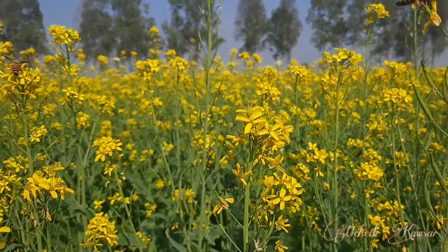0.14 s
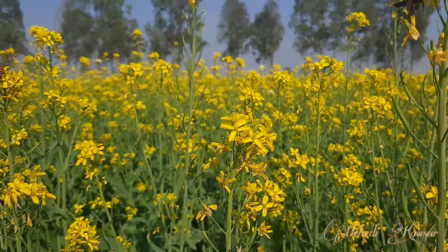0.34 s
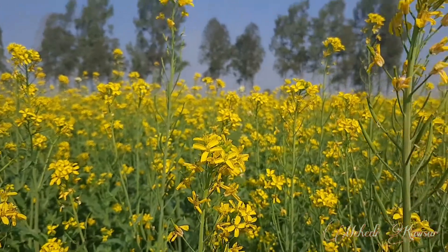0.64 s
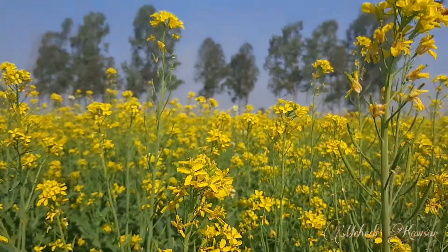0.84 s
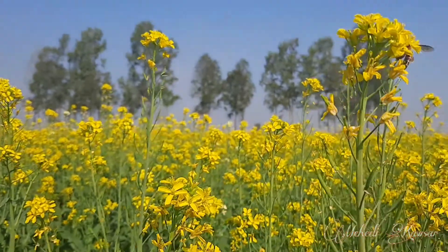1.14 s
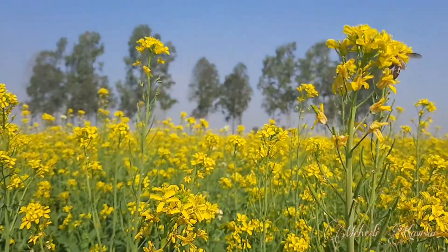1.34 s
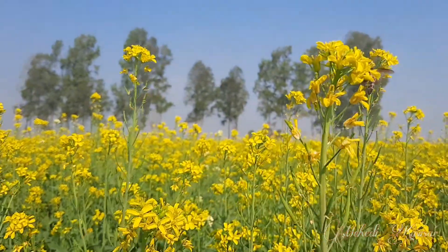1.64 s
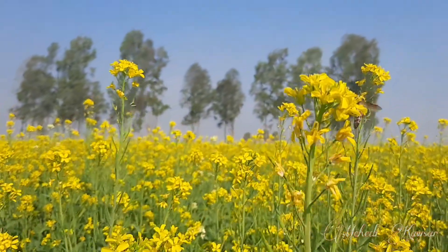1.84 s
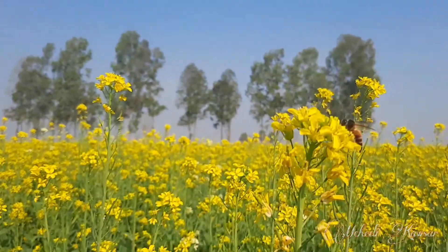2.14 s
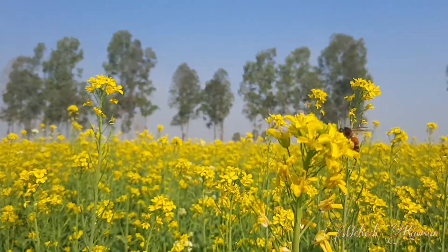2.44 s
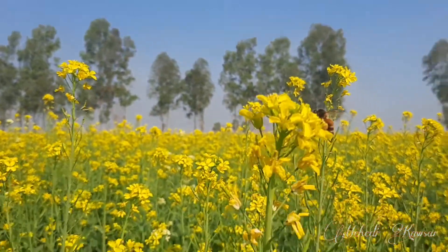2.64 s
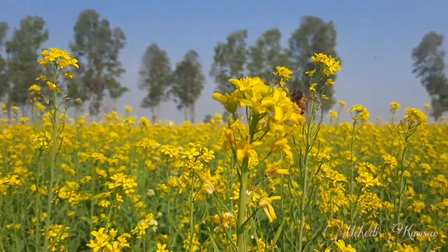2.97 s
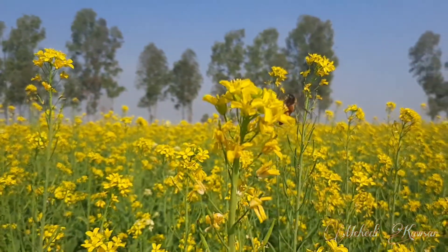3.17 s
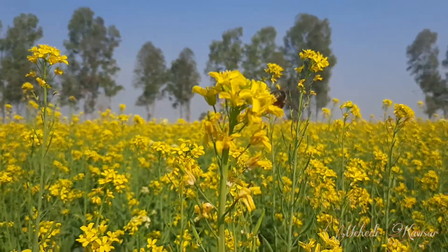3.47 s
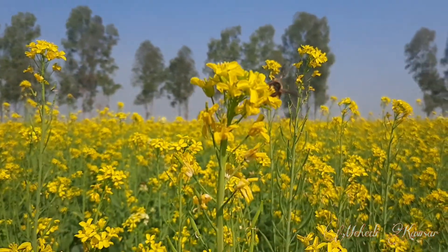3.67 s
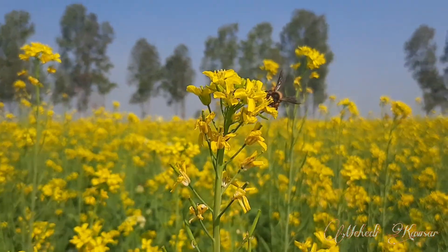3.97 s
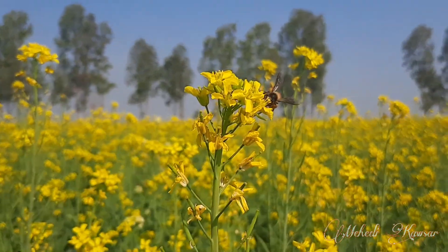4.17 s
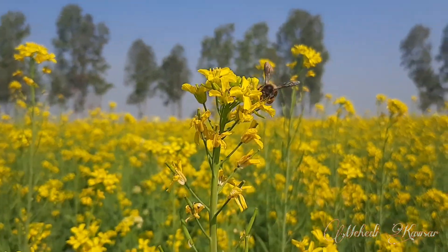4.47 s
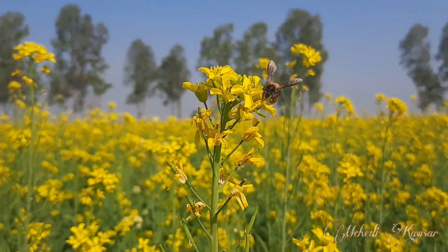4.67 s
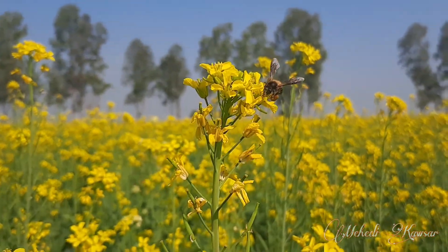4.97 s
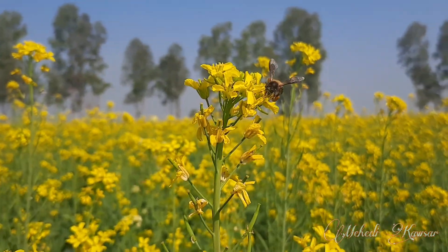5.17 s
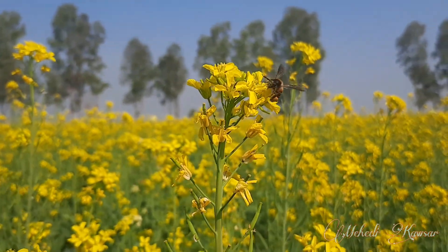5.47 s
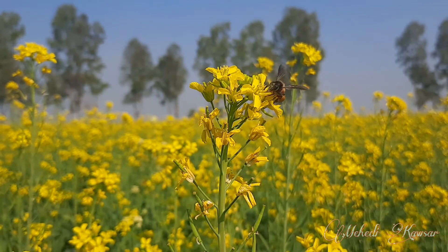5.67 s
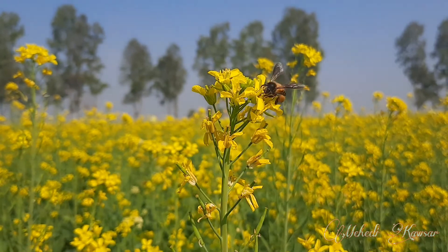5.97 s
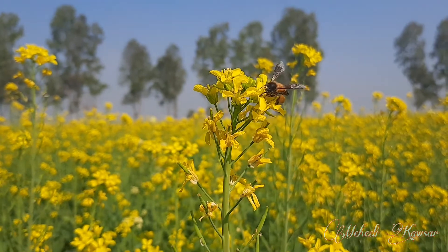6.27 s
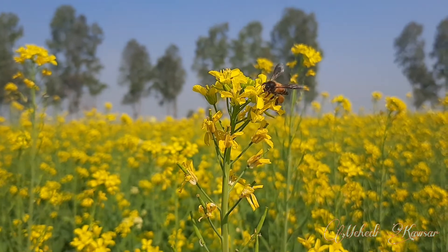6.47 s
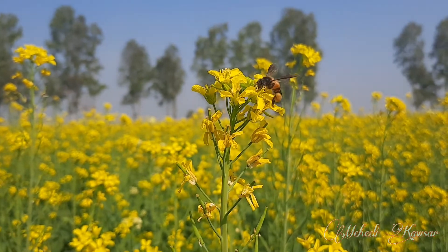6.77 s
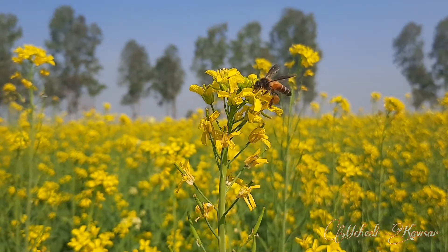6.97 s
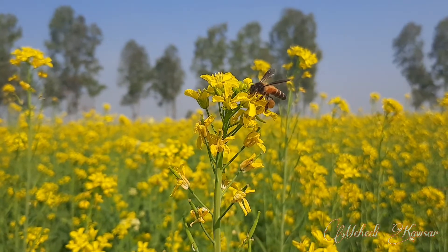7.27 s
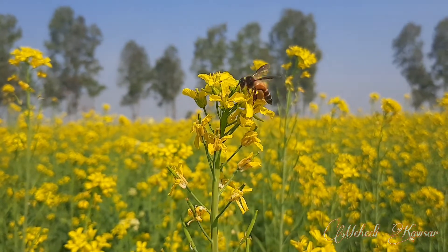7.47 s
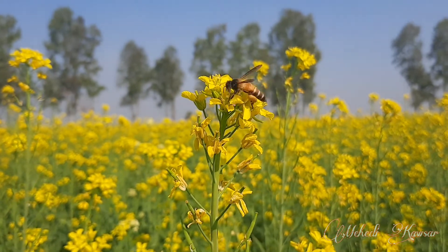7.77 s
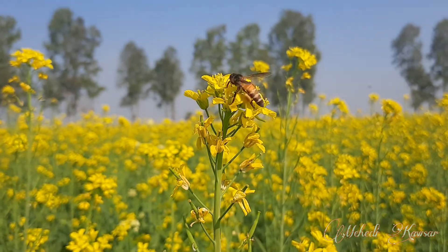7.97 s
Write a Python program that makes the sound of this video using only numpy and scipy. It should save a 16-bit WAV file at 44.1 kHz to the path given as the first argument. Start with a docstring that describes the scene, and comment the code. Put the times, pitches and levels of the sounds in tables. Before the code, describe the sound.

Throughout about eight seconds, a busy flock twitters from trees around an open flowering field, in overlapping hoarse whistles of low, middle and high pitch, slightly right and softened by short leafy echoes. Nearer birds add quick trills, arched whistles, harsh chirrs and falling chips; farther ones give echoing calls and rapid twitters. Below lie fluttering low wind on the microphone, soft airy hiss, and a distant diesel pump thudding between eight and nine times a second, with a fainter, faster engine drone behind. A very faint wavering bee hum fades out by 0.9 s. From about 3.25 to 3.5 s, rough scuffs brush the right side; sharp hollow knocks cluster near 3.65 s, with lighter rubbing until 3.9 s and a small bright tick at 3.8 s. Bird chatter continues, strong around 4.2 to 5.4 s, then somewhat sparser. A faint dull tap falls at 6.9 s.

```python
"""A flock of birds chatters in a line of trees: overlapping hoarse whistles in three registers.
Nearer birds stand out with trills, arches, whistles, chirrs and chips; farther ones call and twitter.
Coloured noise makes the light wind on the microphone and the air in the flowering field. Far-off diesel
pumps thud on as pulse trains; wing-beat harmonics make a bee that hums briefly and lands. Near the middle,
scuffs of noise and ringing knocks brush the right port; a bright tick and a late, dull tap are noise bursts."""
import sys
import numpy as np
from scipy import signal
from scipy.fft import rfft, irfft, next_fast_len
from scipy.io import wavfile
from scipy.ndimage import uniform_filter1d

SR = 44100
rng = np.random.default_rng(int(sys.argv[2]) if len(sys.argv) > 2 else 0)


def persist_wave(psi):
    """Save psi, clipped to +-1, as 16-bit WAV."""
    counts = np.round(np.clip(psi, -1, 1) * 32767).astype(np.int16)
    wavfile.write(sys.argv[1], SR, np.atleast_2d(counts).T)


N = 358091
TIME = np.arange(N) / SR


def undb(db):
    """Decibels to amplitude gain."""
    return 10 ** (np.asarray(db) / 20)


def level(x, db):
    """Scale to an rms level."""
    return x * undb(db) / np.sqrt(np.mean(x ** 2) + 1e-20)


def pan(left_minus_right_db):
    """Left and right gains for a level difference, at constant power."""
    return level(undb(np.array([[left_minus_right_db], [-left_minus_right_db]]) / 2), 0)


def colour_db(hz, points):
    """Read a spectrum on a log-frequency axis; it falls 20 dB/octave past its ends."""
    f, db = np.transpose(points)
    octave, known = np.log2(hz + 1e-9), np.log2(f)
    beyond = np.abs(octave - np.clip(octave, known[0], known[-1]))
    return np.interp(octave, known, db) - 20 * beyond


def coloured(x, points):
    """Filter a sound by a spectrum, without phase shift."""
    size = next_fast_len(N)
    hz = np.arange(size // 2 + 1) * SR / size
    return irfft(rfft(x, size) * undb(colour_db(hz, points)), size)[..., :N]


def split(x, hz):
    """The parts of a sound below and above a frequency."""
    low = signal.sosfiltfilt(signal.butter(4, hz, fs=SR, output="sos"), x)
    return low, x - low


def walk(rate_hz):
    """Slow smoothed chance with an rms near 1."""
    k = max(int(SR / rate_hz), 1)
    steps = np.repeat(rng.standard_normal(N // k + 1), k)
    return level(uniform_filter1d(steps, k)[:N], 0)


def add(out, start_s, sound):
    """Mix a sound in at a time."""
    i = max(int(start_s * SR), 0)
    part = sound[..., :max(out.shape[-1] - i, 0)]
    out[..., i:i + part.shape[-1]] += part


def scatter(x, t60_s, channels=2):
    """Dense echoes from trunks and foliage: decaying noise, drawn separately for each channel."""
    t = TIME[:SR // 2]
    tail = rng.standard_normal((channels, len(t))) * np.exp(-np.log(1000) * t / t60_s)
    tail /= np.sqrt(np.sum(tail ** 2, axis=1, keepdims=True))
    return signal.fftconvolve(x[None], tail, axes=1)[:, :N]


# wind spectrum: [f/Hz, relative density/dB]
WIND_SPECTRUM = [(20, -34), (35, -21), (48, -8), (62, -3), (90, 1.5), (118, -0.5), (150, -8), (185, -14.5),
                 (240, -18), (300, -25), (370, -38), (600, -44)]


def wind(rms_db=-39.0, gust_db=-0.27, buffet_db=2.5, side_db=-17):
    """Low eddies press on both ports almost alike, swelling and fluttering."""
    mid, side = (level(coloured(rng.standard_normal(N), WIND_SPECTRUM), rms_db) for _ in range(2))
    rumble = mid + undb(side_db) * side * np.array([[1], [-1]])
    return rumble * undb(gust_db * walk(1.4) + buffet_db * walk(14)) * pan(1.0)


# open air and leaves: [f/Hz, relative density/dB]
AIR_SPECTRUM = [(30, -16), (100, -7), (220, 14.5), (400, 4.5), (600, 1), (1000, 0.5), (1270, -7.5),
                (1800, 4), (3200, 9), (4600, 5), (5400, -1), (7000, -2), (8300, -12.5), (11000, -9),
                (15500, -9.5)]
# high-band contour, used relative to the mean of its points: [t/s, level/dB]
HISS_CONTOUR = [(0.0, -67.5), (0.48, -65.5), (1.12, -71), (2.56, -73), (2.88, -67.5), (3.36, -74.5),
                (3.52, -73), (3.84, -73), (4.32, -70.5), (4.8, -76), (4.96, -70), (5.76, -73.5),
                (7.84, -69), (8.12, -75)]


def air(rms_db=-56, flicker_db=2.0, hiss_hz=8500, hiss_db=0, hiss_flicker_db=1):
    """Soft wide noise; the band above hiss_hz follows a level contour with random flicker."""
    noise = level(coloured(rng.standard_normal((2, N)), AIR_SPECTRUM), rms_db)
    low, high = split(noise, hiss_hz)
    t_s, contour_db = np.transpose(HISS_CONTOUR)
    relative_db = np.interp(TIME, t_s, contour_db) - np.mean(contour_db)
    hiss_gain = undb(hiss_db + relative_db + hiss_flicker_db * walk(18))
    return low * undb(flicker_db * walk(2.88)) + high * hiss_gain


def near_pump(thud_hz=105, width_s=0.0072, thud_db=-27.0, spread_db=1.5, port_lag_s=0.00023):
    """A slow single-cylinder diesel; distance rounds each exhaust beat to a soft thud."""
    first_firing_s, start_rate_hz, end_rate_hz = 0.0933, 8.647, 8.605
    turns = np.cumsum(np.linspace(start_rate_hz, end_rate_hz, N)) / SR
    turns -= np.interp(first_firing_s, TIME, turns)
    beat = np.round(turns).astype(int)
    # off to the right: the left port hears it later
    port_delay_s = np.array([[port_lag_s], [-port_lag_s]]) / 2
    since_s = (turns - beat) / np.mean([start_rate_hz, end_rate_hz]) - port_delay_s
    size = undb(thud_db + spread_db * rng.standard_normal(beat[-1] + 2))[beat + 1]
    thuds = -size * np.cos(2 * np.pi * thud_hz * since_s) * np.exp(-(since_s / width_s) ** 2)
    return thuds * pan(0.84)


def far_pump(rms_db=-47.5, rate_hz=10.72):
    """A faster engine further away, its beats smeared by echoes into a drone."""
    beats = np.diff(np.floor(TIME * rate_hz), prepend=0)
    smeared = scatter(beats, t60_s=0.26, channels=1)
    drone = coloured(smeared, [(35, -30), (70, 0.0), (112, -2.0), (165, -7.5),
                               (225, -5), (310, -19), (450, -60.0)])  # f/Hz, gain/dB
    return level(drone, rms_db) * pan(1.0)


# wing tones: [multiple of wing beat, relative level/dB]
WING_HARMONICS = [(3, -8), (4, -14), (5, -17), (6, -16), (7, -18)]


def bee(wing_hz=145, rms_db=-65.5, lands_s=0.94, swerve_db=4):
    """A wavering harmonic wing hum that fades out as the bee settles on a flower."""
    beat_hz = wing_hz * (1 + .026 * walk(20) + .03 * walk(110))
    phase = 2 * np.pi * np.cumsum(beat_hz) / SR
    hum = sum(undb(tone_db + swerve_db * walk(44.3)) * np.sin(round(k) * phase)
              for k, tone_db in WING_HARMONICS)
    fade = np.clip((lands_s - TIME) / 0.11, 0, 1)
    return level(hum, rms_db) * fade * pan(0)  # rms_db is before the fade


def note(length_s, start_hz, middle_hz, end_hz, trill_hz, trill_rate_hz, hoarse_hz=42, edge=0.15,
         overtone_db=-40, throb_hz=900, unsteady=.14):
    """A hoarse whistle arching through three pitches; an uneven trill shakes pitch and loudness."""
    t = TIME[:max(int(length_s * SR), 64)]
    u = t / t[-1]
    # parabola through the start, middle and end pitches
    hz = start_hz * (1 - u) * (1 - 2 * u) + middle_hz * (2 * u) * (2 - 2 * u) + end_hz * u * (2 * u - 1)
    rasp, drift = (level(uniform_filter1d(rng.standard_normal(len(t)), size=k), 0) for k in (48, 400))
    trill = 2 * np.pi * trill_rate_hz * np.cumsum(1 + unsteady * drift) / SR
    phase = 2 * np.pi * np.cumsum(hz + hoarse_hz * rasp + trill_hz * np.sin(trill)) / SR
    swell = np.sin(np.pi / 2 * np.clip(np.minimum(u, 1 - u) / edge, 0, 1))
    throb = 1 - min(trill_hz / throb_hz, .8) * np.cos(trill)
    tone = np.sin(phase) + undb(overtone_db) * np.sin(2 * phase)
    return level(swell * throb * tone, 0)


def at_ports(sound, pan_db, lag_s_per_db=.000088):
    """A sound from one side is later and softer at the far port."""
    lag = int(round(pan_db * lag_s_per_db * SR))
    return np.stack([np.roll(sound, max(-lag, 0)), np.roll(sound, max(lag, 0))]) * pan(pan_db)


# filter on the flock's voices: [f/Hz, gain/dB]
FLOCK_SPECTRUM = [(1300, 8), (1800, -9.5), (2100, -7), (2400, -0.5), (2800, -4), (3450, -2), (4080, -3),
                  (4480, -5), (5100, 0), (6000, -19), (6800, -16), (7800, -21), (8500, 4.5)]
# registers: [lowest f/Hz, highest f/Hz, slide spread/octaves, gain/dB, echo/dB, left minus right/dB]
FLOCK_REGISTERS = [(1900, 2700, 0.064, -0.02, -2.5, -.5), (2995, 4600, 0.1277, -0.5, -3.5, -3.5),
                   (5410, 7600, 0.105, -1.5, 1.5, -1)]
# chatter contours of the three registers, before register gain: [t/s, level/dB]
LOW_CONTOUR = [(0.0, -54), (0.24, -48), (0.32, -57), (1.04, -57.5), (1.64, -52), (2.04, -62), (2.24, -53),
               (2.4, -60), (4.0, -53.5), (4.158, -64), (4.36, -58.5), (4.68, -62.5), (5.28, -53.5),
               (5.72, -62.5), (6.0, -54), (6.24, -67), (6.56, -54.5), (6.8, -64), (6.96, -54), (7.3, -57),
               (7.84, -63.5), (8.12, -55)]
MIDDLE_CONTOUR = [(0.0, -57), (0.12, -53.5), (0.6, -48), (0.76, -53), (1.6, -49), (2.0, -51.5),
                  (2.08, -56.5), (2.8, -50.5), (2.88, -43), (3.08, -58), (3.44, -44), (3.52, -48.5),
                  (3.8, -49.5), (4.16, -54.5), (4.44, -45.5), (4.64, -54.5), (5.24, -47.5), (5.56, -55),
                  (6.15, -52), (6.45, -52), (6.8, -56.5), (6.93, -61), (7.2, -48), (7.36, -55),
                  (8.12, -52.5)]
HIGH_CONTOUR = [(0.0, -63), (0.68, -58.5), (1.16, -67), (1.24, -61), (3.24, -65), (3.36, -55), (3.52, -68),
                (4.52, -59.5), (4.6, -73), (5.36, -59), (5.4, -64.5), (7.0, -67), (7.08, -58),
                (8.12, -69.5)]


def flock(count=850, shortest_s=.012, longest_s=.046, spread_db=2.0, fall_oct=0.044, echo_t60_s=0.44,
          side_db=1.08, flutter_db=0.6):
    """Many birds twitter over one another in three registers, to the right, blurred by the trees."""
    out = np.zeros((2, N))
    contours = (LOW_CONTOUR, MIDDLE_CONTOUR, HIGH_CONTOUR)
    for (low_hz, high_hz, slide_oct, gain_db, echo_db, pan_db), contour in zip(FLOCK_REGISTERS, contours):
        voices = np.zeros((2, N))
        places, shapes = rng.random((count, 4)), rng.standard_normal((count, 4))  # count per register
        for (when, pitch, length, trill), (glide, bend, loud, side) in zip(places, shapes):
            hz = low_hz + (high_hz - low_hz) * pitch
            slide = 2 ** ((fall_oct + slide_oct * glide) / 2)
            length_s = shortest_s + (longest_s - shortest_s) * length
            chirp = note(length_s, hz * slide, hz * (1 + 0.0245 * bend), hz / slide,
                         280 * trill ** 3, 40 + 70 * pitch)
            add(voices, when * N / SR, at_ports(chirp * undb(spread_db * loud), pan_db + side_db * side))
        echo = undb(echo_db) * scatter(voices[1], echo_t60_s) * pan(pan_db)
        chorus = coloured(voices + echo, FLOCK_SPECTRUM)
        # even out the power over 1/16 s, then apply the contour
        chorus /= np.sqrt(uniform_filter1d(np.mean(chorus ** 2, axis=0), SR // 16) + 1e-12)
        contour_db = np.interp(TIME, *np.transpose(contour))
        out += chorus * undb(gain_db + contour_db + flutter_db * walk(14))
    return out


def perch(sound, lag_s=.00023, spread_s=.00005):
    """Each call has its own bearing to the right: the left port hears it a little later."""
    gap = np.zeros(int(abs(lag_s + spread_s * rng.standard_normal()) * SR))
    return np.stack([np.concatenate([gap, sound]), np.concatenate([sound, gap])])


def arched_call(rise_s, fall_s, top_hz, half_width_s, flank_db, hoarse_hz=45, edge_s=.007):
    """A whistle sweeps up to a rounded top and down again, louder or softer on each flank."""
    depth = .47  # share of the top pitch lost far down the flanks
    t = TIME[:max(int((rise_s + fall_s) * SR), 64)] - rise_s
    rasp = level(uniform_filter1d(rng.standard_normal(len(t)), size=48), 0)
    hz = top_hz * (1 - depth * t ** 2 / (t ** 2 + half_width_s ** 2)) + hoarse_hz * rasp
    edges = np.clip(np.minimum(t + rise_s, fall_s - t) / edge_s, 0, 1)
    swell = edges * undb(np.interp(t, [-rise_s, 0, fall_s], flank_db))
    return np.sqrt(2) * swell * np.sin(2 * np.pi * np.cumsum(hz) / SR)


def chirr(length_s, hz, rate_hz, hoarse_hz=600, pulsing=0.18):
    """A scolding buzz: quick pulses of a very hoarse note."""
    voice = note(length_s, hz, hz, hz, 0, 0, hoarse_hz)
    return level(voice * (1 - pulsing * np.cos(2 * np.pi * rate_hz * TIME[:len(voice)])), 0)


# levels of nearer birds are before gain_db and port shading
# trills: [t/s, length/s, middle f/Hz, rise/Hz, shake rate/Hz, level/dB]
TRILL_NOTES = [(0.059, 0.046, 4560, 0, 62, -47), (0.345, 0.12, 4870, 118, 130, -50),
               (2.665, 0.062, 4380, 947, 120, -49), (2.805, 0.14, 3570, 1000, 150, -50.5),
               (3.785, 0.22, 3440, -2, 41.5, -50), (4.354, 0.074, 4370, 45, 51, -50),
               (4.412, 0.072, 4450, 450, 135, -44.5), (6.068, 0.028, 4380, 0, 82, -52)]
# arches: [top t/s, rise/s, fall/s, top f/Hz, half-width/s, start level/dB, top level/dB, end level/dB]
ARCHED_CALLS = [(0.565, .063, .064, 5070, 0.033, -46, -52, -35),
                (1.972, 0.024, .022, 6870, 0.037, -50, -54, -61),
                (2.137, .008, .008, 7000, .016, -56, -55, -56),
                (3.628, 0.031, 0.018, 5060, 0.071, -48, -40, -49),
                (3.735, .006, 0.0616, 5040, 0.046, -49, -46.5, -39.5),
                (4.978, .036, 0.058, 5780, .03, -68, -57.5, -41),
                (5.234, .004, 0.061, 4750, 0.021, -42, -41, -46.5),
                (5.723, 0.013, 0.032, 4650, 0.025, -49, -54, -50),
                (7.23, 0.0087, 0.033, 4780, .027, -49, -48, -48)]
# plain whistles: [t/s, length/s, middle f/Hz, rise/Hz, level/dB]
WHISTLE_NOTES = [(0.591, 0.032, 1950, -300, -56), (0.684, 0.039, 2390, 150, -45),
                 (0.772, 0.043, 2680, -250, -49.5), (0.97, 0.082, 3406, 152, -48),
                 (1.117, 0.051, 3125, 78, -51), (1.153, 0.067, 2070, -300, -50),
                 (1.24, 0.05, 7380, 600, -66.5), (1.399, 0.052, 2600, 40, -47),
                 (2.175, 0.058, 3395, -60, -53), (3.167, 0.013, 4370, -50, -47),
                 (3.189, 0.014, 4270, -50, -43), (4.2, 0.021, 4570, -350, -43),
                 (4.247, .04, 6130, 450, -58.5), (4.256, 0.074, 3537, 76, -45),
                 (4.886, 0.036, 3350, -250, -41), (4.946, 0.04, 5720, 100, -53),
                 (5.05, .013, 3560, 400, -44.5), (5.077, 0.02, 4400, 150, -43),
                 (5.365, 0.019, 7030, 0, -66), (5.425, 0.071, 2560, 70, -46),
                 (6.637, 0.066, 2257, 30, -50.5), (6.68, .032, 6240, 130, -66),
                 (7.726, 0.042, 1015, 0, -66.5), (8.033, 0.037, 4750, -450, -59)]
# harsh chirrs: [t/s, length/s, centre f/Hz, pulse rate/Hz, level/dB]
CHIRR_CALLS = [(0.895, 0.062, 5800, 36, -53.5), (2.336, .065, 4600, 60, -54.5),
               (4.155, 0.049, 5750, 54, -60), (4.28, .035, 5340, 90, -56), (4.828, 0.078, 4800, 51, -54.5),
               (5.061, 0.035, 5330, 80, -54), (5.32, 0.048, 5330, 82, -59), (5.826, .055, 4390, 79, -55),
               (6.213, 0.065, 4970, 70, -56.5)]
# falling chips: [t/s, length/s, start f/Hz, level/dB]
CHIP_NOTES = [(1.267, 0.023, 3780, -50), (1.403, 0.043, 3950, -46), (1.583, 0.019, 5100, -52),
              (1.634, 0.013, 4950, -51), (2.141, 0.021, 4950, -48.5), (2.464, 0.023, 4900, -49),
              (2.592, 0.034, 3870, -54.5), (3.144, 0.014, 4730, -47), (3.147, 0.052, 3730, -49),
              (3.413, 0.034, 3410, -45), (4.299, .025, 4660, -49), (7.274, 0.028, 4640, -46.5),
              (7.487, 0.018, 4970, -49.5), (7.711, 0.027, 4900, -52.5), (8.069, 0.033, 4200, -49.5)]
# casing shading of nearer birds: [f/Hz, left minus right/dB]
CASING_SHADE = [(1500, 29), (2100, 7.5), (2700, -0.5), (3400, -7.5), (4400, -6), (5000, -7), (5700, -3),
                (6700, 13.5), (9000, 26), (15000, -5)]


def birds(gain_db=-1.5, waver_db=1.8, echo_db=-4.0, echo_t60_s=0.15):
    """Nearer birds' trills, arches, whistles, chirrs and chips, with a short wash from the trees."""
    trill_sweep_hz_per_s = 12100  # depth times rate: a faster trill is shallower
    chip_fall_oct_per_s, chip_early_share = 12, .6  # share of the fall done by the chip's middle
    song = np.zeros((2, N))
    for s, length_s, hz, rise_hz, rate_hz, note_db in TRILL_NOTES:
        trill = note(length_s, hz - rise_hz / 2, hz, hz + rise_hz / 2,
                     trill_sweep_hz_per_s / rate_hz, rate_hz, hoarse_hz=60.5)
        add(song, s, perch(trill) * undb(note_db))
    for top_s, rise_s, fall_s, top_hz, half_width_s, *flank_db in ARCHED_CALLS:
        add(song, top_s - rise_s, perch(arched_call(rise_s, fall_s, top_hz, half_width_s, flank_db)))
    for s, length_s, hz, rise_hz, note_db in WHISTLE_NOTES:
        whistle = note(length_s, hz - rise_hz / 2, hz, hz + rise_hz / 2, 0, 0)
        add(song, s, perch(whistle) * undb(note_db))
    for s, length_s, hz, rate_hz, note_db in CHIRR_CALLS:
        add(song, s, perch(chirr(length_s, hz, rate_hz)) * undb(note_db))
    for s, length_s, hz, note_db in CHIP_NOTES:
        fall = 2 ** (-chip_fall_oct_per_s * length_s)
        chip = note(length_s, hz, hz * fall ** chip_early_share, hz * fall, 0, 0)
        add(song, s, perch(chip) * undb(note_db))
    # paths through the foliage interfere, so every note wavers
    left, right = song * undb(gain_db + waver_db * walk(200))
    shaded_left = coloured(left, [(hz, shade / 2) for hz, shade in CASING_SHADE])
    shaded_right = coloured(right, [(hz, -shade / 2) for hz, shade in CASING_SHADE])
    return np.stack([shaded_left, shaded_right]) + undb(echo_db) * scatter(right, echo_t60_s)


def twitter(length_s, first_hz, last_hz, rate_hz, uneven=.28, spread_db=1.0, hoarse_hz=110):
    """A run of tiny falling chips, each a little different in time, pitch and strength."""
    note_s, fall_oct, pitch_spread_oct = 0.0164, .12, 0.0502
    run = np.zeros(int((length_s + 2 * note_s) * SR))
    starts = np.arange(max(round(length_s * rate_hz), 1)) / rate_hz
    slide = 2 ** (fall_oct / 2)
    for s, (late, pitch, loud) in zip(starts, rng.standard_normal((len(starts), 3))):
        hz = np.interp(s, [0, length_s], [first_hz, last_hz]) * 2 ** (pitch_spread_oct * pitch)
        chip = note(note_s, hz * slide, hz, hz / slide, 0, 0, hoarse_hz)
        add(run, s + uneven * late / rate_hz, chip * undb(spread_db * loud))
    return run


# levels of far birds are before gain_db
# twitters: [t/s, length/s, first f/Hz, last f/Hz, chip rate/Hz, level/dB]
TWITTER_RUNS = [(0.107, 0.25, 3530, 3400, 25, -49.5), (0.76, 0.17, 3650, 3290, 32, -53),
                (1.501, 0.071, 4790, 3470, 67, -51.5), (1.673, 0.054, 4480, 3620, 68, -51.5),
                (2.5, .065, 3360, 3300, 46, -49), (3.01, .07, 3450, 3470, 26, -50),
                (5.184, 0.13, 3380, 3530, 56, -50), (6.014, 0.042, 3930, 3400, 73, -53),
                (6.283, 0.211, 3704, 3794, 63, -53.5), (6.563, .14, 3870, 3790, 45, -53.5),
                (6.844, .085, 3390, 2650, 70, -60), (7.063, 0.17, 4320, 4270, 40, -51),
                (7.548, .08, 3580, 3570, 70, -54)]
# far calls, hoarse echoing whistles: [t/s, length/s, start f/Hz, middle f/Hz, end f/Hz, level/dB]
FAR_CALLS = [(0.3, 0.14, 4300, 4710, 4880, -56), (0.64, 0.14, 4700, 5130, 4730, -60),
             (1.034, .11, 3900, 4340, 3820, -55.5), (1.067, 0.076, 3800, 3400, 3360, -57),
             (1.306, 0.053, 3190, 3650, 4060, -53), (1.445, 0.031, 4350, 4470, 4400, -51.5),
             (1.532, 0.13, 2350, 2358, 2420, -52), (1.862, 0.095, 3400, 3450, 3470, -50.5),
             (2.018, 0.04, 3900, 4200, 4660, -54), (2.76, .03, 4550, 4470, 4370, -56),
             (3.842, 0.21, 2350, 2550, 2570, -56), (4.519, .07, 3450, 3550, 3610, -52),
             (4.779, .08, 3800, 3490, 3490, -51), (5.556, 0.094, 2150, 2254, 2370, -57),
             (6.277, .055, 3485, 3750, 4220, -55), (6.371, .12, 3750, 3550, 3520, -55),
             (6.397, 0.16, 2150, 2253, 2284, -52.5), (6.722, 0.06, 4530, 4250, 3970, -60.5),
             (6.778, .065, 3850, 3790, 3640, -52), (6.84, .08, 3400, 2936, 2610, -58),
             (6.909, 0.11, 2550, 2547, 2670, -56), (7.93, 0.12, 2284, 2424, 2340, -53.5)]


def far_birds(gain_db=-1, pan_db=-3, hoarse_hz=85, waver_db=2.5, echo_db=-2.0, echo_t60_s=0.2):
    """Hoarse calls and twitters from the trees, trailed by much echo."""
    song = np.zeros((2, N))
    for s, length_s, first_hz, last_hz, rate_hz, call_db in TWITTER_RUNS:
        add(song, s, perch(twitter(length_s, first_hz, last_hz, rate_hz)) * undb(call_db))
    for s, length_s, start_hz, middle_hz, end_hz, call_db in FAR_CALLS:
        call = note(length_s, start_hz, middle_hz, end_hz, 0, 0, hoarse_hz)
        add(song, s, perch(call) * undb(call_db))
    song *= undb(gain_db + waver_db * walk(120))
    return (song + undb(echo_db) * scatter(song[1], echo_t60_s)) * pan(pan_db)


# scuffs over the port: [peak t/s, rise/s, fall/s, level/dB, treble re level/dB]
PORT_SCUFFS = [(3.257, 0.0041, 0.0093, -34.5, 1), (3.281, 0.015, 0.02, -32.5, 3),
               (3.311, 0.013, 0.022, -22, -1), (3.374, 0.012, 0.008, -32, -3),
               (3.383, 0.0046, 0.0079, -22.5, -3), (3.396, 0.011, 0.022, -23.5, -1),
               (3.428, 0.017, 0.043, -36, -1), (3.459, 0.0018, 0.0045, -33, -6),
               (3.473, 0.0064, 0.0035, -29, -5), (3.665, 0.017, 0.017, -31.5, -21),
               (3.724, 0.024, 0.012, -33, -11), (3.741, 0.016, 0.029, -32, -6),
               (3.83, 0.039, 0.033, -49.5, 4), (3.885, 0.025, 0.044, -47, 4)]
# scuff spectrum: [f/Hz, relative density/dB]
SCUFF_SPECTRUM = [(90, -1), (200, -0.5), (330, 1), (520, -2.5), (750, -5.5), (1050, -4.5), (1800, -9.5),
                  (2600, -15.5), (3800, -15.5), (5000, -20), (7000, -30.5), (8500, -41.5), (11500, -25.5),
                  (15500, -40)]
# knocks on the casing: [t/s, peak level/dB]
CASING_KNOCKS = [(3.6404, -22), (3.6588, -13.5), (3.661, -19), (3.6643, -12), (3.6672, -22), (3.6733, -22),
                 (3.739, -23)]
# casing modes: [f/Hz, t60/s, relative level/dB]
CASING_MODES = [(423, 0.008, -9), (975, 0.007, -7), (1390, 0.003, 17), (2360, 0.0028, 4),
                (4200, 0.0033, -20)]


def handling(grain_db=2.0, treble_hz=7000, leak_db=-29):
    """Sticking and slipping at the right port, with knocks that ring the casing."""
    body_power, treble_power = 0, 0
    for s, rise_s, fall_s, scuff_db, treble_db in PORT_SCUFFS:
        pressure = undb(scuff_db) * np.exp(-((TIME - s) / np.where(TIME < s, rise_s, fall_s)) ** 2)
        body_power = body_power + pressure ** 2
        treble_power = treble_power + (pressure * undb(treble_db)) ** 2
    slips = rng.standard_normal((2, N)) * undb(grain_db * walk(700))
    body, treble = split(level(coloured(slips, SCUFF_SPECTRUM), 0), treble_hz)
    out = body * np.sqrt(body_power) + treble * np.sqrt(treble_power)
    t = TIME[:SR // 20]
    ring = sum(undb(mode_db) * np.exp(-np.log(1000) * t / t60_s) * np.sin(2 * np.pi * hz * t)
               for hz, t60_s, mode_db in CASING_MODES)
    ring = uniform_filter1d(ring, size=4)  # a soft contact rounds the blow
    for s, peak_db in CASING_KNOCKS:
        add(out, s, ring / np.max(np.abs(ring)) * undb(peak_db))
    return out * np.array([[undb(leak_db)], [1]])  # the left port hears only a trace


def click(at_s=3.787, level_db=-43, rise_s=0.0026, decay_s=0.0047):
    """One small, bright tick: a noise burst with exponential flanks."""
    spectrum = [(1000, -22), (4000, 2), (7500, -1), (9000, -16), (15000, -3)]  # f/Hz, relative/dB
    burst = level(coloured(rng.standard_normal((2, N)), spectrum), level_db)
    return burst * np.exp(-np.abs(TIME - at_s) / np.where(TIME < at_s, rise_s, decay_s)) * pan(5.0)


def soft_tap(at_s=6.932, level_db=-53, width_s=0.0056):
    """One faint, dull tap: a low noise burst with exponential flanks."""
    spectrum = [(250, 3), (500, 6), (900, -18), (1500, -18)]  # f/Hz, relative/dB
    thud = level(coloured(rng.standard_normal(N), spectrum), level_db)
    return thud * np.exp(-np.abs(TIME - at_s) / width_s) * pan(3)


def scene():
    """Everything in the field, at the two ports."""
    background = wind() + air() + near_pump() + far_pump()
    animals = bee() + flock() + birds() + far_birds()
    contacts = handling() + click() + soft_tap()
    return background + animals + contacts


def record(dry, top_hz=15600):
    """The recorder cuts the top with a steep elliptic low-pass."""
    return signal.sosfilt(signal.ellip(10, .2, 80, top_hz, fs=SR, output="sos"), dry)


dry = scene()
out = record(dry)
persist_wave(out)
```